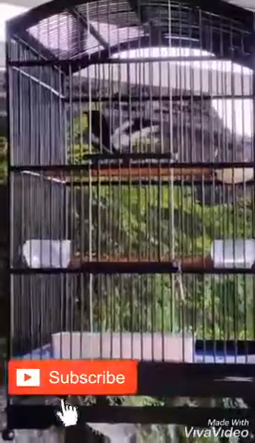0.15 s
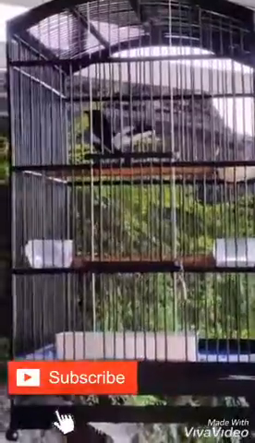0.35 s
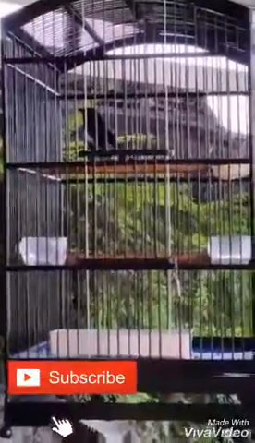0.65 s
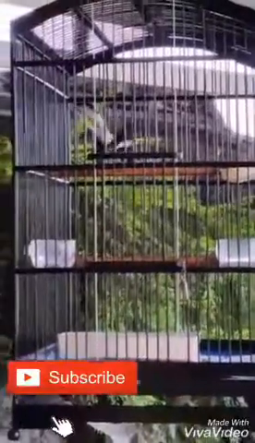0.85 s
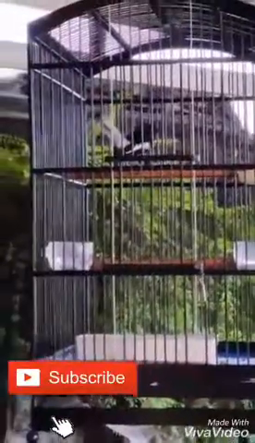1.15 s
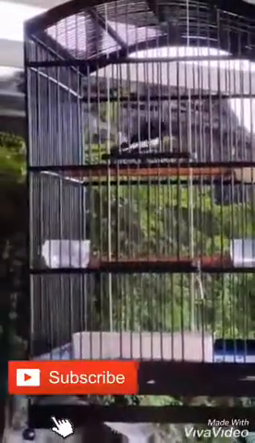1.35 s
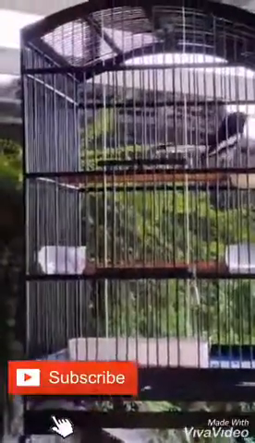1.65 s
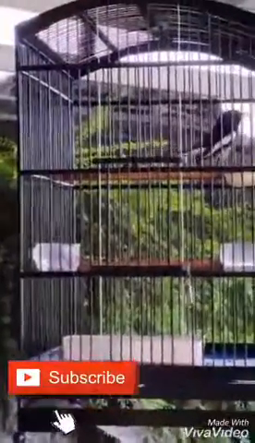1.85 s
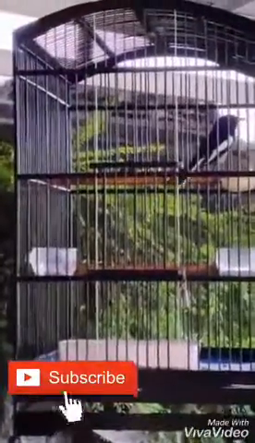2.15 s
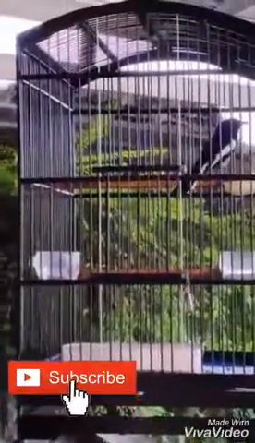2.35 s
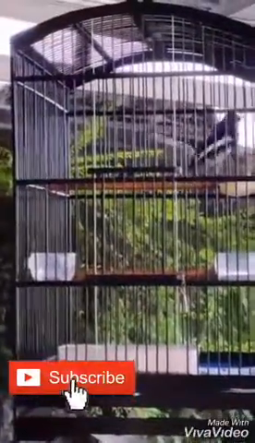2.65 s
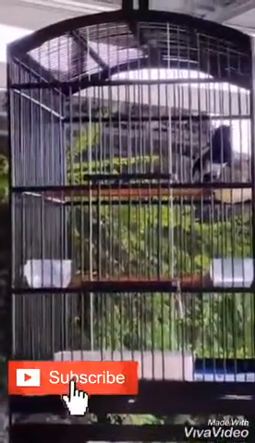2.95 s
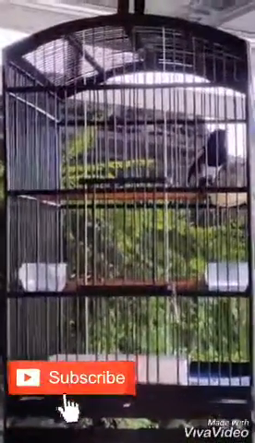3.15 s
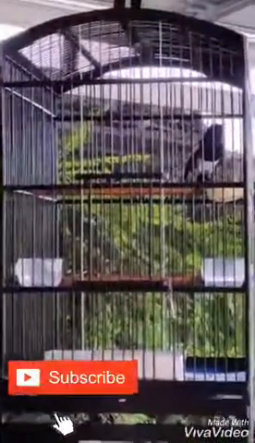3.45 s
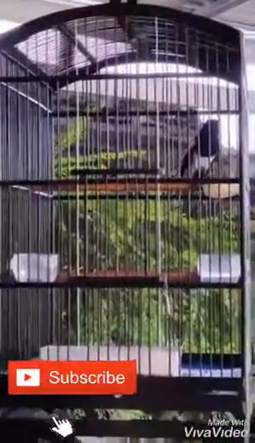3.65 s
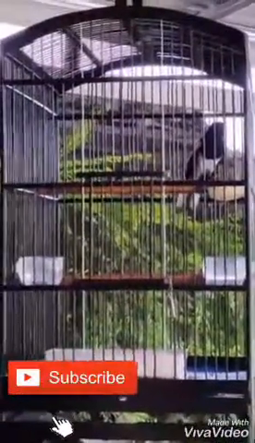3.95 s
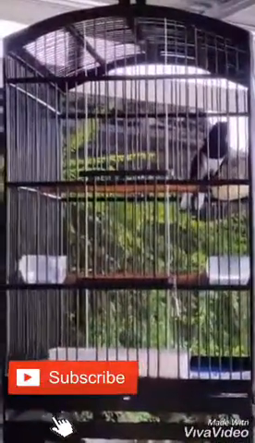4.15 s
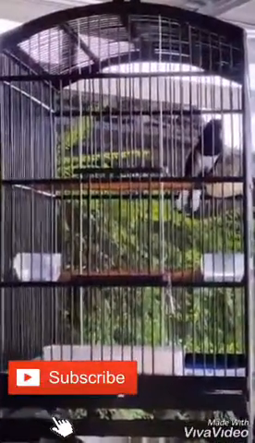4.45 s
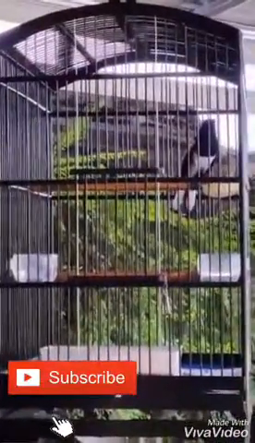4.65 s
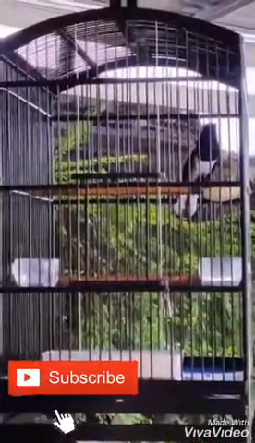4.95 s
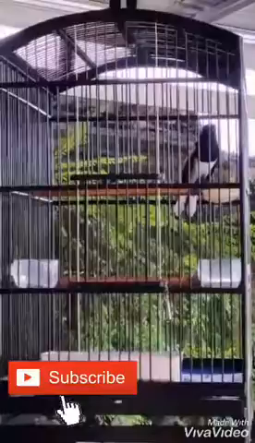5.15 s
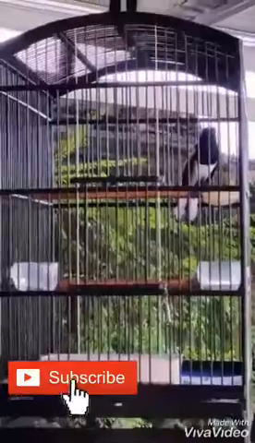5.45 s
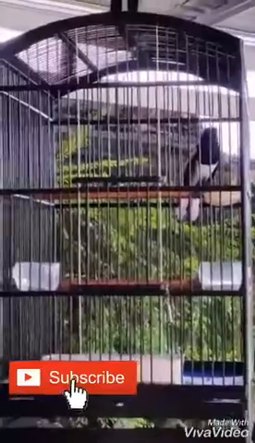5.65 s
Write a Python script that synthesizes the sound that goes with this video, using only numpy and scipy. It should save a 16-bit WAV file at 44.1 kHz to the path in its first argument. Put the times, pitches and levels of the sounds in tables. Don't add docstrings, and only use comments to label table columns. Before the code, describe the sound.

For the first two seconds there is mostly soft, lumpy low traffic rumble and thin yard air. Far-off hen clucks sound at 0.5 and 1.3 seconds, with very faint cockerel crows, all blurred by echo. From 2.0 to 2.6 a close songbird sings clear whistles: a quick rise, a flatter note, a leap upward and a falling slide. Short hard-wall reflections follow, then a pause. At 3.25 comes a tiny harsh scold of rapid slides. From 3.75 rough steps climb into a bright sustained whistle at 3.9 to 4.25, followed by lower, buzzy rasps until about 4.55. Faint dove coos and a distant crow hide underneath. Two sharp falling chips at 4.93 and 5.01 lead to a climbing whistle from 5.17, piercing near 5.35, ending in a brief two-toned note near 5.45. Echo fades into rumble. The small stereo recorder sounds slightly grainy, with the background lifting after calls.

```python
import sys
import numpy as np
from scipy import signal
from scipy.fft import rfft, irfft, next_fast_len
from scipy.io import wavfile
from scipy.ndimage import uniform_filter1d, map_coordinates

SR = 44100
rng = np.random.default_rng(int(sys.argv[2]) if len(sys.argv) > 2 else 0)


def transcribe(signal):
    frames = np.atleast_2d(signal).T
    limited = np.clip(frames, -1, 1)
    pcm = np.round(limited * 32767).astype(np.int16)
    wavfile.write(sys.argv[1], SR, pcm)


def attenuation_scalar(level_db):
    decades = np.asarray(level_db, float) / 20
    return 10 ** decades


N = 255780


def unit(x):
    return x / np.sqrt(np.mean(x ** 2) + 1e-20)


def along(points, hz):
    f, v = np.transpose(points)
    return np.interp(np.log(hz + 1), np.log(f + 1), v)


def wobble(rate_hz, size):
    knots = rng.standard_normal(int(size * rate_hz / SR) + 4)
    return map_coordinates(knots, [np.arange(size) * rate_hz / SR])


def filtered(x, response):
    m = next_fast_len(x.shape[-1] + 8192)
    return irfft(rfft(x, m) * response(np.fft.rfftfreq(m, 1 / SR)), m)[..., :x.shape[-1]]


def voice(rows, throat, count, breath_db, fade_db=5.0):
    s, *cols = np.transpose(rows)
    t = np.arange(s[0], s[-1], 1 / SR)
    hz, db, overtone_db, rough = (np.interp(t, s, c) for c in cols)
    rough = np.clip(rough, 0, 1)
    phase = 2 * np.pi * np.cumsum(hz * (1 + .03 * rough * wobble(450, len(t)))) / SR
    k = np.arange(1, count + 1)[:, None]
    per_overtone_db = 0.31 * np.minimum(overtone_db, 0) - fade_db
    size_db = overtone_db * (k > 1) + per_overtone_db * np.maximum(k - 2, 0) + along(throat, k * hz)
    sizes = attenuation_scalar(size_db) * (k * hz < .45 * SR)
    tone = np.sum(sizes * np.sin(k * phase), 0) / np.sqrt(np.sum(sizes ** 2, 0) / 2 + 1e-12)
    puffs = rng.standard_normal(len(t)) * (1 + np.cos(phase))
    air = unit(filtered(puffs, lambda f: attenuation_scalar(along(throat, f))))
    sound = tone * attenuation_scalar(14.0 * rough * wobble(280, len(t))) + attenuation_scalar(breath_db) * rough ** 1.4 * air
    edges = np.clip(np.minimum(t - s[0], s[-1] - t) / 0.0023, 0, 1)
    return s[0], attenuation_scalar(db) * edges * sound


def glide(row, overtone_db, rough, arch=0, edge_db=0, swell_db=0):
    s, length_s, hz, end_hz, db = row
    u = np.linspace(0, 1, num=9)
    pitch_hz = (hz + (end_hz - hz) * u) * (1 + arch * np.sin(np.pi * u))
    level_db = db - edge_db * (2 * u - 1) ** 4 + swell_db * (u - .5)
    return [(s + length_s * a, f, b, overtone_db, rough) for a, f, b in zip(u, pitch_hz, level_db)]


# (time [s], pitch [Hz], level [dB], overtone level [dB])
RISE = [(1.982, 2625, -65, -8), (2.01, 3030, -28.5, -21), (2.024, 3312, -33, -26.5),
        (2.052, 3354, -29.5, -20), (2.1, 3460, -57, -16)]
FLAT = [(2.13, 2322, -48.5, -41), (2.168, 2623, -23.5, -36), (2.19, 2754, -25, -37),
        (2.26, 2628, -20, -41.5)]
LEAP = [(2.26, 2654, -34, -21), (2.275, 3707, -22.5, -21), (2.291, 4124, -23, -22),
        (2.354, 4190, -34.5, -33.5)]
FALL = [(2.415, 3490, -43.5, -13), (2.436, 3274, -25, -23.5), (2.476, 3132, -19.5, -25.5),
        (2.527, 2742, -20, -43), (2.54, 2717, -20.5, -34.5), (2.554, 2219, -22.5, -50),
        (2.579, 2052, -42, -21)]
LONG = [(3.877, 2654, -27, 0.5), (3.94, 2786, -20.5, 9), (4.047, 2910, -23.5, -1),
        (4.174, 2854, -19.5, -18), (4.198, 2792, -24.5, -16.5), (4.233, 2956, -30.5, -2.5),
        (4.244, 2838, -22.5, -13), (4.27, 2853, -31.5, -12)]
CLIMB = [(5.165, 1503, -61, -25), (5.181, 2071, -42, -17.5), (5.205, 2744, -31, -30),
         (5.247, 3042, -22.5, -10.5), (5.323, 3234, -36.5, -9.5), (5.352, 3632, -13, -26),
         (5.386, 3697, -18, -22), (5.438, 3580, -45, -25)]


def whistles():
    hold_rough, rough_per_oct_s = 0.018, 0.0036
    notes = []
    for rows in [RISE, FLAT, LEAP, FALL, LONG, CLIMB]:
        s, hz, db, overtone_db = np.transpose(rows)
        slide_oct_s = np.abs(np.gradient(np.log2(hz), s))
        notes.append(np.transpose([s, hz, db, overtone_db, hold_rough + rough_per_oct_s * slide_oct_s]))
    return notes


# (start [s], length [s], top pitch [Hz], level [dB])
CHIPS = [
    (4.93, .062, 6370, -30.5),
    (5.01, 0.05, 6433, -21),
]


def chips():
    rest_hz, sag_lengths = 1990, 1.2
    u = np.linspace(0, 1, num=9)
    swell_db = np.interp(u, [0, 0.28, 1], [-16.5, 0, -6])
    notes = []
    for s, length_s, top_hz, db in CHIPS:
        hz = rest_hz + (top_hz - rest_hz) * np.exp(-u / sag_lengths)
        notes.append(np.transpose([s + length_s * u, hz, db + swell_db, -6 + 0 * u, 0.048 + 0 * u]))
    return notes


# (start [s], length [s], start pitch [Hz], end pitch [Hz], level [dB])
SCOLD = [
    (3.244, .018, 4650, 5685, -39),
    (3.259, .05, 5650, 5292, -33),
    (3.262, .03, 5230, 3674, -39),
    (3.274, 0.021, 3610, 4560, -36),
    (3.298, 0.04, 4540, 4516, -36.5),
    (3.305, 0.0099, 4440, 3326, -27.5),
    (3.313, .03, 3520, 2199, -38),
    (5.016, .022, 2226, 1192, -56),
]


def scold():
    return [glide(row, overtone_db=-14, rough=0.28) for row in SCOLD]


# (start [s],
# length [s], start pitch [Hz], end pitch [Hz], level [dB])
STEPS = [(3.739, 0.018, 1405, 1360, -49), (3.755, 0.044, 1178, 1285, -40), (3.784, 0.03, 1491, 1634, -35),
         (3.821, 0.018, 1832, 2130, -29.5), (3.843, .033, 2193, 2222, -28), (4.197, .038, 3140, 2960, -36),
         (4.226, .048, 2896, 2336, -31), (4.248, .071, 2586, 2586, -37), (4.251, .075, 2259, 2208, -29),
         (4.3, 0.059, 2493, 2513, -31.5), (4.337, 0.075, 1929, 1982, -30.5),
         (4.392, 0.044, 2404, 2304, -32.5), (4.44, .071, 1655, 1471, -35.5), (4.455, .075, 2280, 2059, -36),
         (4.5, 0.063, 1051, 1058, -38), (0, .03, 2668, 2343, -75)]


def rasps():
    notes = []
    for row in STEPS:
        octaves = np.log2(row[2] / 2040)
        notes.append(glide(row, -3 - 8.5 * octaves, 0.32 - .1 * octaves, edge_db=5))
    return notes


# (time [s], upper pitch [Hz], lower pitch [Hz], upper level [dB], lower level [dB])
DUET = [(5.442, 3725, 3043, -38, -27), (5.46, 3897, 3059, -17, -8), (5.475, 3992, 3048, -25, -39.5),
        (5.49, 3957, 3077, -39.5, -42)]
MIXES = [
    (1, 0),
    (0, 1),
    (1, 1),
    (0, 2),
    (2, -1),
    (-1, 2),
    (2, 1),
    (3, 0),
]
MIX_DB = [3.5, -5.5, -15, -26, -17.5, -25.5, -25, -24]


def duet():
    notes = []
    for (m, n), mix_db in zip(MIXES, MIX_DB):
        rows = []
        for s, up_hz, low_hz, up_db, low_db in DUET:
            db = (abs(m) * up_db + abs(n) * low_db) / (abs(m) + abs(n)) + mix_db
            rows.append((s, m * up_hz + n * low_hz, db, -50, .06))
        notes.append(rows)
    return notes


# (frequency [Hz], t60 [s])
PORCH = [(500, 0.25), (2500, 0.31), (4000, 0.32), (5700, 0.31), (7500, 0.26), (12000, 0.22)]


def on_porch(notes, direct_db, wet_db):
    out = np.zeros((2, N + SR))
    for s, x in notes:
        hz, t, z = signal.stft(rng.standard_normal((2, SR // 2)), SR, nperseg=256)
        decay = attenuation_scalar(-60 * t / along(PORCH, hz)[:, None])
        tail = signal.istft(z * decay, SR, nperseg=256)[1]
        tail *= np.clip(np.arange(tail.shape[1]) / SR / 0.0036 - .4, 0, 1)
        tail *= attenuation_scalar(wet_db) / np.linalg.norm(tail[0])
        tail[[0, 1], [4, 0]] += attenuation_scalar(direct_db)
        heard = signal.fftconvolve(x[None], tail, axes=1)
        out[:, round(s * SR):][:, :heard.shape[1]] += heard
    return out[:, :N]


# (frequency [Hz], gain [dB])
BEAK = [(500, -61.5), (950, -20), (1500, -14), (2200, -8), (3500, 4.5), (5500, -1.5), (8000, -5.5),
        (11000, 0.5), (13500, 1), (16000, -11.5)]


def songbird():
    sung = whistles() + chips() + rasps() + scold()
    notes = [voice(n, BEAK, count=9, breath_db=1.5) for n in sung]
    notes += [voice(n, BEAK, count=1, breath_db=3) for n in duet()]
    return on_porch(notes, direct_db=-2.5, wet_db=-3)


# (start [s], length [s], pulse rate [Hz], level [dB])
CLUCKS = [
    (0.504, .125, 325.6, -48),
    (1.299, .12, 311.9, -49),
]
# (frequency [Hz], gain [dB])
HEN = [(500, -67), (800, -20.5), (970, -17.5), (1300, -25), (1640, -1), (1960, -7.5), (2290, -5), (2620, 0),
       (3100, -16.5), (4250, -24), (6000, -36), (12000, -28), (16000, -43)]


def hen():
    rough, end_rough = 0.17, .75
    notes = []
    for s, length_s, hz, db in CLUCKS:
        slack_hz, edge_db = hz * (1 - 0.079), db - 20
        rows = [(s, slack_hz, edge_db, -9, rough),
                (s + 0.26 * length_s, hz, db + 0.5, -1.8, rough),
                (s + (0.57 - .14) * length_s, hz, db, -1.2, rough),
                (s + 0.57 * length_s, hz * 1.1, db, -1.6, end_rough),
                (s + 0.99 * length_s, slack_hz, edge_db, -9, end_rough)]
        notes.append(voice(rows, HEN, count=30, breath_db=2.5, fade_db=1))
    return notes


# (start [s], length [s], start pitch [Hz], end pitch [Hz], level [dB])
CROW = [
    (.72, .26, 1504, 1673, -84.5),
    (.95, 0.37, 1690, 1710, -87.5),
    (1.447, 0.26, 1495, 1602, -81),
    (3.895, 0.19, 1683, 1903, -63),
]
YELP = [
    (1.74, 0.066, 944, 940, -74.5),
]
CROW_END = [
    (1.76, .5, 629, 793, -69),
    (2.26, .09, 774.5, 760, -62.5),
]
COOS = [
    (3.66, 0.17, 448, 498, -70.5),
    (3.95, 0.64, 476.5, 490, -61.5),
    (4.96, 0.44, 553.3, 400, -64.5),
]


def far_callers():
    rough, fade_db = .45, 3.5
    calls = [glide((s, n, a / 2, b / 2, db), 5.1, rough, edge_db=fade_db) for s, n, a, b, db in CROW]
    calls.append(glide(CROW_END[0], -19.5, rough / 3, swell_db=15.5))
    calls.append(glide(CROW_END[1], -20, .3))
    calls.append(glide(YELP[0], -20, rough / 2, swell_db=-13.5))
    calls += [glide(c, -17.5, 0.34, arch=0.055, edge_db=fade_db) for c in COOS]
    flat_throat = [(300, 0), (4000, 0)]
    return [voice(c, flat_throat, count=2, breath_db=-35) for c in calls]


def farmyard():
    return on_porch(hen() + far_callers(), direct_db=-5, wet_db=-2)


# (frequency [Hz], left minus right [dB])
PORTS = [(60, -5), (110, -2.5), (200, -5.5), (380, 2), (700, 1.5), (1290, -6.5), (2380, 3), (4400, -3),
         (8120, -10), (15000, -7.5)]


def through_ports(near):
    return filtered(near, lambda hz: attenuation_scalar(along(PORTS, hz) * np.array([[.5], [-.5]])))


# (frequency [Hz], correlation [-])
ALIKE = [(60, .99), (130, 1), (290, .8), (640, 1), (1410, 0.18), (3100, 0.13), (15000, .1)]


def rush(spectrum):
    def response(hz):
        angle = np.arccos(np.clip(along(ALIKE, hz), -1, 1)) / 2
        return attenuation_scalar(along(spectrum, hz)) * [np.cos(angle), np.sin(angle)]

    mid, side = filtered(rng.standard_normal((2, N)), response)
    return unit(np.array([mid + side, mid - side]))


# (time [s], level [dB])
TRAFFIC = [(0, -62.5), (.45, -64.5), (.97, -64), (1.03, -58), (1.14, -64.5), (1.5, -60.5), (1.901, -60),
           (3.099, -63.5), (3.7, -64), (4.301, -65.5), (4.86, -66.5), (5.1, -62.5), (5.8, -64)]
# (frequency [Hz], density [dB per Hz])
RUMBLE = [(12, -42), (20, -2), (27, -27), (54, -1), (70, 0), (156, -4), (213, -8), (254, -16.5), (320, -19),
          (420, -45.5), (700, -120)]
# (frequency [Hz], density [dB per Hz])
AIR = [(150, -44), (250, -10.5), (406, -4.5), (499, -5.5), (838, -9), (979, -11.5), (1670, -11),
       (1960, -12), (2720, -11.5), (3770, -26), (15600, -26.5)]


def background(near):
    quiet_db, gate_s = -66.5, 0.14
    power = np.abs(uniform_filter1d(np.mean(near ** 2, 0), size=2000))
    level_db = 10 * np.log10(power + attenuation_scalar(2 * quiet_db)) - quiet_db
    keep = np.exp(-1 / (gate_s * SR))
    open_db = signal.lfilter([1 - keep], [1, -keep], level_db, zi=[18])[0]
    traffic_db = np.interp(np.arange(N) / SR, *np.transpose(TRAFFIC))
    rumble_db = traffic_db + 0.24 * open_db + 1.7 * wobble(11.0, N)
    air_db = -79.5 + 0.63 * (traffic_db - traffic_db.mean()) + 0.51 * open_db + 0.52 * wobble(24, N)
    return attenuation_scalar(rumble_db) * rush(RUMBLE) + attenuation_scalar(air_db) * rush(AIR)


def scene():
    near = songbird() + farmyard()
    return through_ports(near) + background(near)


FRAME_S = 2048 / 48000


def blocks(power, edges, axis):
    sizes = np.diff(np.r_[edges, power.shape[axis]])
    other_axes = [i for i in range(power.ndim) if i != axis]
    means = np.add.reduceat(power, edges, axis) / np.expand_dims(sizes, other_axes)
    return np.repeat(means, sizes, axis) + 1e-20


def thrifty_core(x, grain_db, hole_db):
    size = 2 * round(FRAME_S * SR)
    hz, _, z = signal.stft(x, SR, "cosine", size)
    band = blocks(np.abs(z) ** 2, np.arange(0, len(hz), 20), axis=1)
    grain = np.sqrt(band * size) * signal.stft(rng.standard_normal(x.shape), SR, "cosine", size)[2]
    loudest = band[:, hz > 1000].max(1, keepdims=True)
    kept = (band > attenuation_scalar(2 * hole_db) * loudest) | (hz < 2900)[:, None]
    both = np.array([np.where(kept, 1, attenuation_scalar(-11.5)) * z, kept * grain])
    sound, grain = signal.istft(both, SR, "cosine", size)[1][..., :N]
    slope = np.diff(x, prepend=0) ** 2
    fast = np.abs(uniform_filter1d(slope, size=400)) + 1e-16
    slow = np.abs(uniform_filter1d(slope, size=size)) + 1e-16
    return sound + attenuation_scalar(grain_db) * grain * np.sqrt(np.minimum(fast / slow, 1))


# (start [s], end [s], level [dB])
STAND_INS = [
    (2.289, 2.341, -46.5),
    (3.324, 3.339, -56.5),
    (3.941, 4.186, -39.5),
    (3.96, 4.265, -48),
    (4.25, 4.294, -36.5),
    (5.465, 5.496, -44.5),
]
STAND_IN_HZ = 375 * np.array([22.5, 17.5, 22.5, 24.5, 24.5, 24.5])


def stand_ins():
    t = np.arange(N) / SR
    out = np.zeros((2, N))
    for (start, end, db), hz in zip(STAND_INS, STAND_IN_HZ):
        level_db = db + 3.7 * wobble(40, N) - 380 * np.clip(t - end, 0, 1)
        swell = attenuation_scalar(level_db) * np.clip((t - start) / 0.0042, 0, 1)
        out += swell * np.sin(2 * np.pi * hz * t) * attenuation_scalar([[-8], [0]])
    return out


def rebuilt_top(core, true, most_db, hiss_db):
    split_hz, join_hz, shift_hz = 8250, 6750, 3750
    grid = dict(nperseg=588, noverlap=441)
    hz, t, low = signal.stft(core, SR, **grid)
    z = signal.stft(true, SR, **grid)[2]
    step = round(shift_hz / hz[1])
    turn = np.exp(2j * np.pi * step * np.arange(len(t)) / 4)
    patch = np.clip((hz - join_hz) // shift_hz + 1, 1, 3)[:, None]
    copy = sum((patch == k) * np.roll(low, k * step, 1) * turn ** k for k in (1, 2, 3))
    bands = np.r_[0, 110:140:5, 140:len(hz):10]
    frames = np.flatnonzero(np.diff(t // FRAME_S, prepend=-1))

    def tile(v):
        return blocks(blocks(np.abs(v) ** 2, bands, axis=1), frames, axis=2)

    fine = uniform_filter1d(uniform_filter1d(np.abs(copy) ** 2, size=3, axis=1), size=5, axis=2)
    copy = copy * (tile(copy) / (np.abs(fine) + 1e-20)) ** 0.15
    hiss = signal.stft(rng.standard_normal(core.shape), SR, **grid)[2]
    copy = copy * np.minimum(np.sqrt(tile(z) / tile(copy)), attenuation_scalar(most_db))
    copy = copy + attenuation_scalar(hiss_db) * hiss * np.sqrt(tile(z) / tile(hiss))
    joined = np.where((hz < split_hz)[:, None], low, copy)
    return signal.istft(joined, SR, **grid)[1][:, :N] + stand_ins()


def top_cut(x):
    return signal.sosfilt(signal.butter(12, 15710, fs=SR, output="sos"), x)


def record(dry):
    core = thrifty_core(dry, grain_db=-17, hole_db=-39)
    full = rebuilt_top(core, dry, most_db=1.5, hiss_db=-23.0)
    mix = filtered(full, lambda hz: hz < 15700)
    return top_cut(mix)


dry = scene()
out = record(dry)
transcribe(out)
```